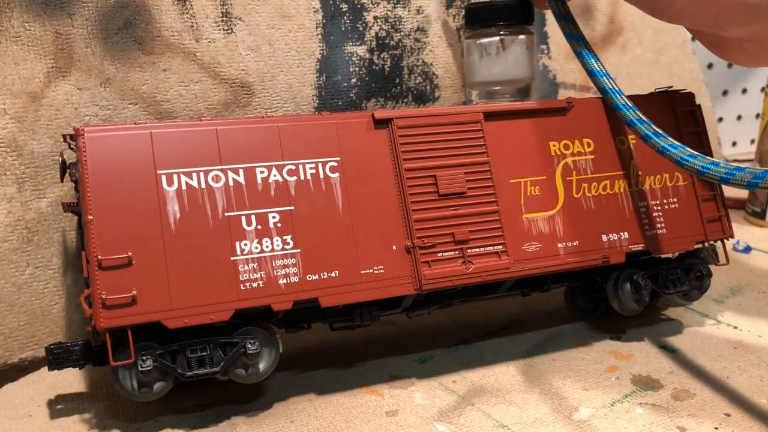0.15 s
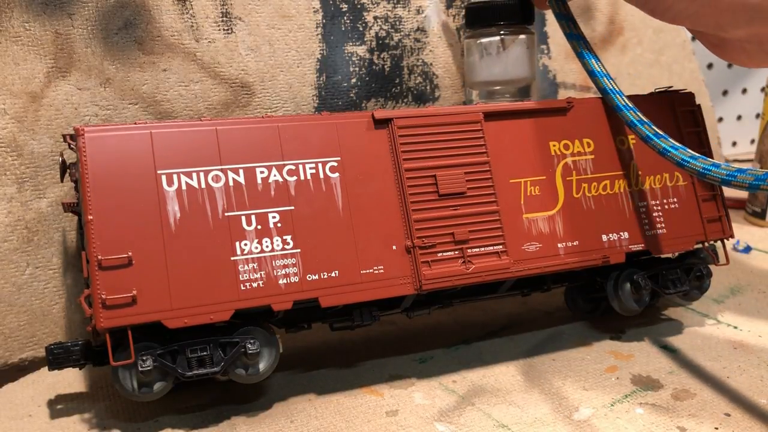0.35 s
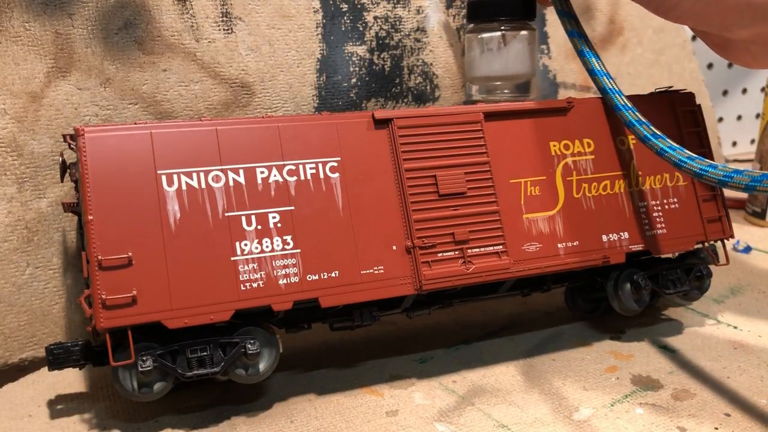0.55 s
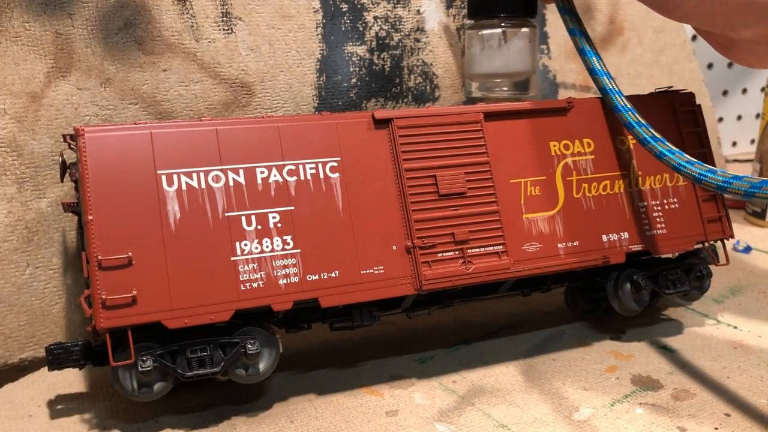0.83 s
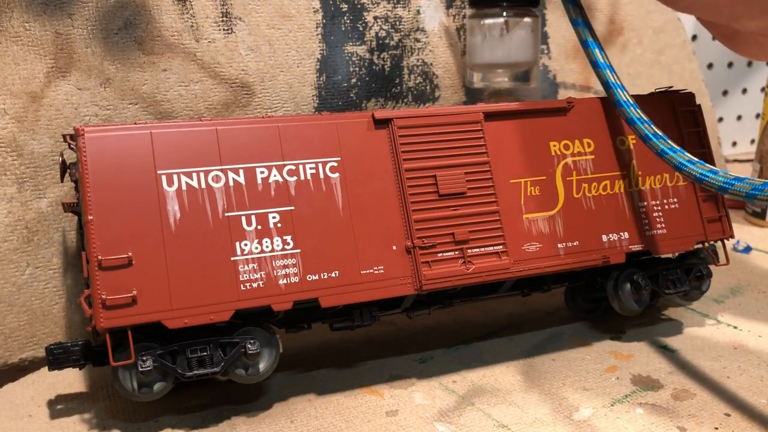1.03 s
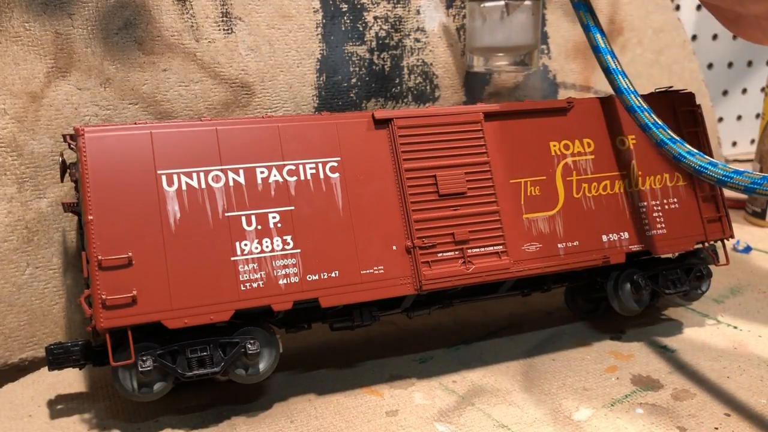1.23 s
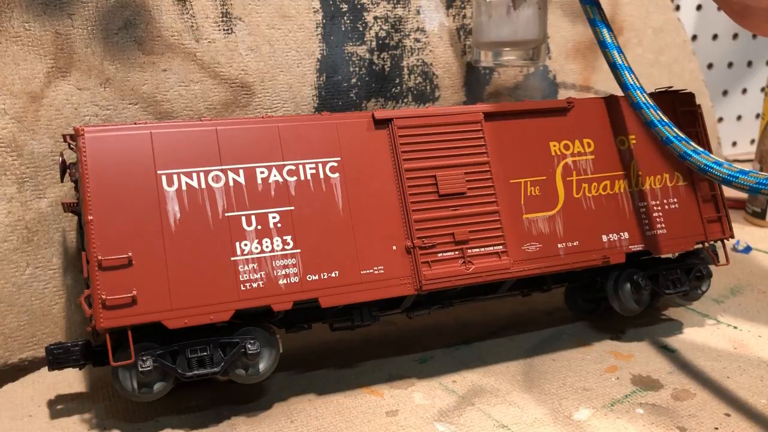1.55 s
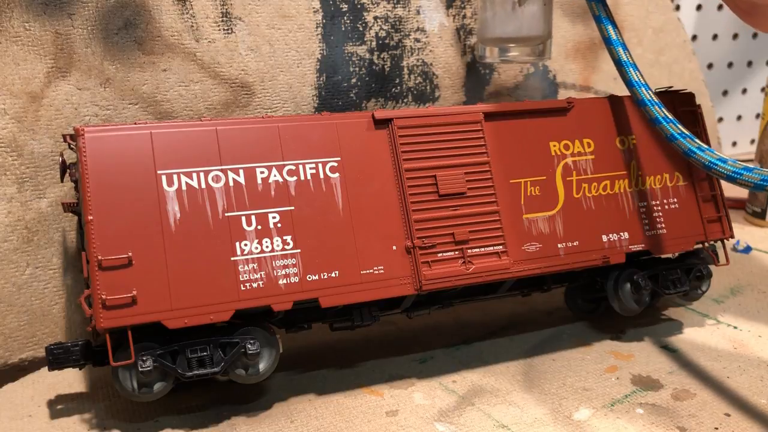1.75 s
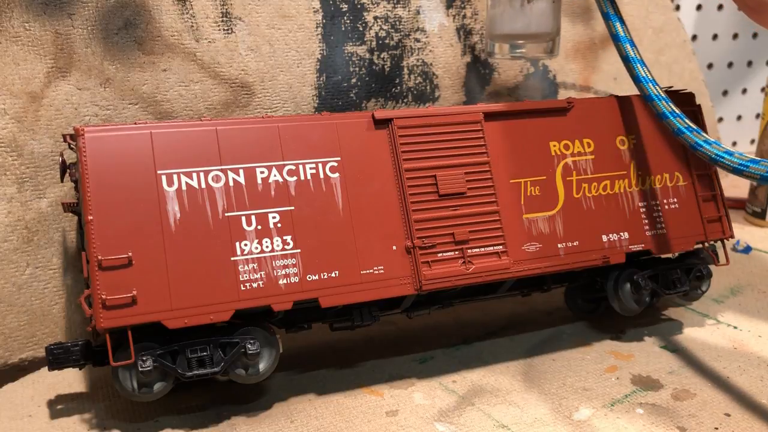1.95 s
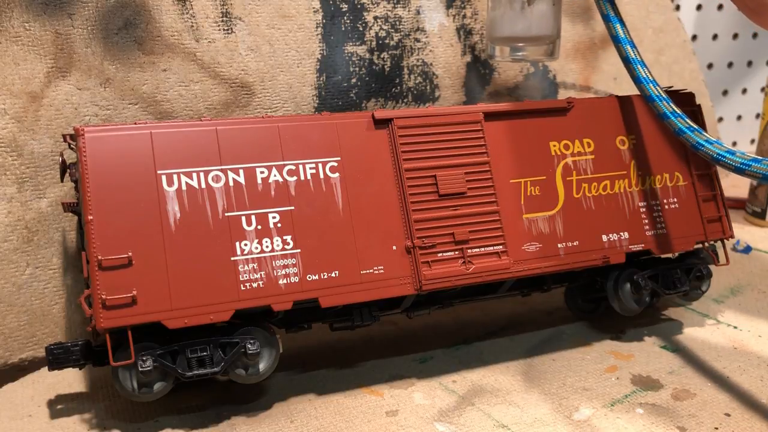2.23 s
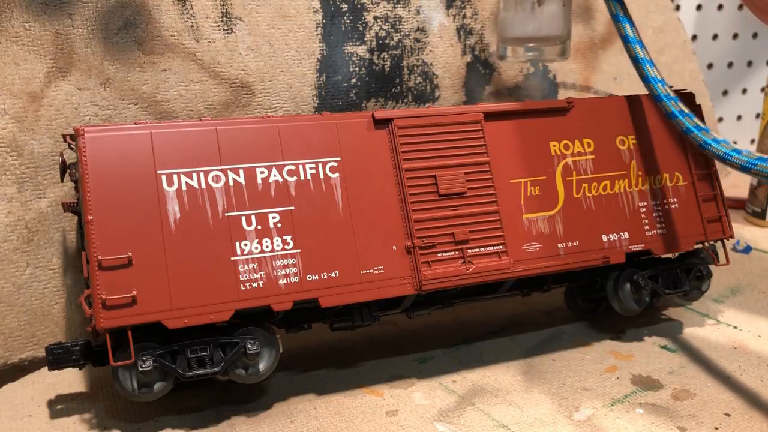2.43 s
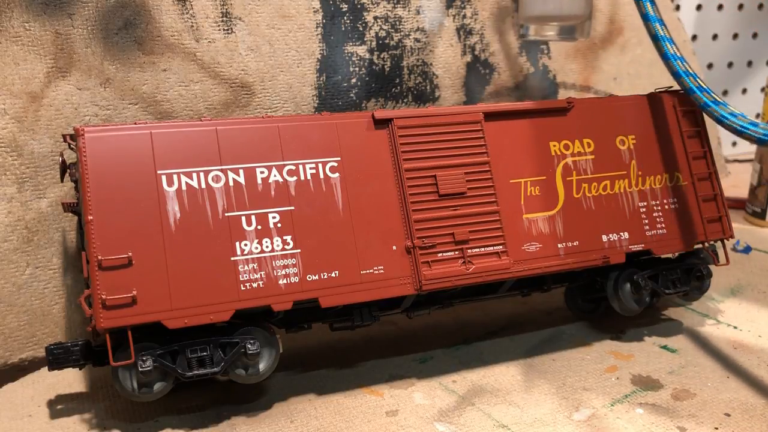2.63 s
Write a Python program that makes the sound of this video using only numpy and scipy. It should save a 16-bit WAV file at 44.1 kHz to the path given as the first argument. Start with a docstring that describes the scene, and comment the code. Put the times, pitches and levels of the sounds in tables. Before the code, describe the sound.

Close airbrush spray: a bright, airy hiss from about 0.02 to 0.37 seconds, a tiny metallic trigger tick at 0.5, then seven softer bursts of 0.14 to 0.2 seconds at 0.59, 0.9, 1.15, 1.37, 1.71, 1.96 and 2.6. Faint leaking air precedes some, notably from 2.15 to 2.45. A quiet compressor hums and rattles steadily below; short small-workshop echoes follow each burst.

```python
"""Airbrush bursts over a compressor

Eight short bursts of air from an airbrush are heard close by in a small workshop. The hiss is turbulent jet
noise, filtered differently for each hand position; a faint thin hiss leads into several bursts, and air leaks
for a while between two of them. The trigger ticks once: a noise crack and decaying modes. Beneath, a piston
compressor drones almost evenly: shaft harmonics, pulsing rattle and motor whine. Bench and walls return
decaying echoes."""
import sys
import numpy as np
from scipy import signal
from scipy.fft import rfft, irfft
from scipy.io import wavfile
from scipy.ndimage import uniform_filter1d

SR = 44100
rng = np.random.default_rng(int(sys.argv[2]) if len(sys.argv) > 2 else 0)


def to_wav(s):
    """Save 16-bit WAV."""
    ch = np.atleast_2d(s).T  # columns
    pcm = np.round(np.clip(ch, -1, 1) * 32767)  # PCM
    wavfile.write(sys.argv[1], SR, pcm.astype(np.int16))


def magnitude_from_level(level_db):
    """Linear magnitude for a level in decibels (20 dB per decade)."""
    exponent = np.asarray(level_db, float) / 20
    return 10 ** exponent


N = 123479  # samples, 2.8 s


def colour(x, table, shift=1):
    """Linear filtering: a spectrum shaped by (hz, gain_db) points, moved by a ratio, scaled to rms 1."""
    f = np.maximum(np.fft.rfftfreq(len(x), 1 / SR), 1)
    hz, db = np.array(table, float).T
    gain_db = np.interp(np.log(f / shift), np.log(hz), db)
    y = irfft(rfft(x) * magnitude_from_level(gain_db), len(x))
    return y / y.std()


def walk(rate):
    """Slow random modulation: values held for 1 / rate seconds, smoothed twice, scaled to spread 1."""
    hold = int(SR / rate)
    steps = np.repeat(rng.standard_normal(N // hold + 1), hold)[:N]
    w = uniform_filter1d(uniform_filter1d(steps, hold), hold)
    return w / w.std()


# shaft speed: time_s, turns_per_s
SHAFT_SPEED = [(0., 27.4), (.45, 27.4), (.6, 27.34), (2.25, 27.34), (2.45, 27.25), (2.8, 27.2)]
# harmonics of the shaft rate: multiple, relative_level_db
SHAFT_HARMONICS = [(2, -18.5), (3, 0), (4, -8.5), (5, -0.5), (6, -1.5), (7, -33), (8, -15), (9, -13),
                   (10, -11.5), (11, -11.5), (12, -30), (13, -10), (14, -35), (15, -19), (16, -13.5),
                   (17, -39), (18, -17), (19, -22.5), (20, -27), (21, -23.5), (22, -13), (23, -37),
                   (24, -8.5), (25, -21.5), (26, -43), (27, -23), (28, -21.5), (29, -23), (30, -43),
                   (32, -23), (33, -37), (34, -33), (35, -15.5), (36, -23), (37, -24.5), (38, -44),
                   (39, -35), (41, -26), (43, -41)]
# two knocks a turn in each vibrating part:
# highest_multiple, first_knock_turns, gap_turns, second_knock_db, push_or_pull_sign
PART_KNOCKS = [(7, .352, .44, 0, -1), (16, .697, .315, -2, 1), (44, 1.027, .36, -2, 1)]
# ringing tones of the casing: multiple
RINGING_MULTIPLES = (22, 24, 35)
# slow swell of those tones: time_s, level_change_db
CASING_SWELL = [(0, -2), (.12, -4.5), (.2, -16), (.42, -6), (.5, -2.5), (.9, -1.5), (1.5, -3), (2.1, -1.5),
                (2.4, 3.5), (2.8, 1)]
RING_TURN = 0.25  # cycles; a part driven at its resonance is a quarter cycle off the knock
DRONE_DB, SWAY_DB, SWAY_PER_S = -51, 0.5, 4
WAVER_DB_PER_MULTIPLE, WAVER_PER_S = 0.071, 4.76


def shaft_drone(t, turns):
    """Fourier series of a periodic force: each harmonic takes its phase from two knocks a turn."""
    drone = np.zeros(N)
    for k, db in SHAFT_HARMONICS:
        first, gap, second_db, sign = next(row[1:] for row in PART_KNOCKS if k <= row[0])
        phase = np.angle(1 + magnitude_from_level(second_db) * np.exp(-2j * np.pi * k * gap))
        if k in RINGING_MULTIPLES:
            change_db = np.interp(t, *np.array(CASING_SWELL).T)
            phase += 2 * np.pi * RING_TURN
        else:
            change_db = WAVER_DB_PER_MULTIPLE * k * walk(WAVER_PER_S)  # higher harmonics waver more
        drone += sign * magnitude_from_level(db + change_db) * np.cos(2 * np.pi * k * (turns - first) + phase)
    sway_db = SWAY_DB * walk(SWAY_PER_S)
    return magnitude_from_level(DRONE_DB + sway_db) * np.sqrt(2) * drone  # root 2: harmonic levels are rms


# rattle spectrum: hz, gain_db
RATTLE_COLOUR = [(25, -19.5), (45, -10), (70, -6), (150, 1.5), (300, -11), (500, -11), (800, -9),
                 (1000, -7.5), (1300, -13.5), (1700, -18), (2300, -18), (3000, -20), (3800, -18.5),
                 (5600, -20.5), (10000, -17.5), (13000, -14), (13800, -11), (14400, -12), (15500, -13),
                 (16000, -31)]
RATTLE_DB, RATTLE_PULSE_DB, RATTLE_TURN = -53.5, -1, 0.23  # faintest at this fraction of a turn


def rattle(turns):
    """Amplitude modulation: broadband noise rises and falls once a turn."""
    pulse = magnitude_from_level(RATTLE_PULSE_DB * np.cos(2 * np.pi * (turns - RATTLE_TURN)))
    return magnitude_from_level(RATTLE_DB) * pulse * colour(rng.standard_normal(N), RATTLE_COLOUR)


# motor whine: hz, level_db_rms, width_hz
MOTOR_WHINE = [(2057, -74, 90), (2240, -74, 90), (2526, -74, 80), (3790, -74, 60)]


def whine():
    """Resonance: narrow peaks select thin bands from noise."""
    out = np.zeros(N)
    for hz, db, width in MOTOR_WHINE:
        peak = signal.iirpeak(hz, hz / width, fs=SR)
        band = signal.lfilter(*peak, rng.standard_normal(N))
        out += magnitude_from_level(db) * band / band.std()
    return out


def compressor(t):
    """Superposition: periodic drone and rattle share one shaft angle, with the motor whine added."""
    turns = np.cumsum(np.interp(t, *np.array(SHAFT_SPEED).T)) / SR
    return shaft_drone(t, turns) + rattle(turns) + whine()


# faint thin hiss, mostly just ahead of a burst, the long one a leak of air: start_s, end_s, level_db
THIN_HISS_TIMES = [(0, 0.024, -53), (0.881, 0.907, -42), (1.141, 1.163, -45), (2.146, 2.455, -51.5),
                   (2.583, 2.612, -48.5)]
# thin hiss spectrum: hz, gain_db
THIN_HISS_COLOUR = [(3000, -13), (5000, -9), (6900, -8), (7500, -2.5), (9000, -2.5), (9600, -9), (11200, -2.5),
                    (12800, -6), (13500, -4.5), (13900, -1), (14800, -0.5), (15600, 1), (16000, -4)]
THIN_HISS_FADE_S = 0.025


def thin_hiss(t):
    """Gated noise: a thin hiss, short just ahead of bursts and longer where air leaks, at half height at each
    start and end."""
    gate = np.zeros(N)
    for start, end, db in THIN_HISS_TIMES:
        inside = np.minimum(t - start, end - t)
        gate += magnitude_from_level(db) * np.clip(inside / THIN_HISS_FADE_S + 0.5, 0, 1)
    return gate * colour(rng.standard_normal(N), THIN_HISS_COLOUR)


# bursts: start_s, length_s, level_db before finger pressure, change_to_end_db, colour_shift_ratio,
# hand_position
AIR_BURSTS = [(0.018, 0.35, -18.5, -1.5, 1.024, "near"), (0.586, 0.177, -22, 2.5, 1.018, "close"),
              (0.896, 0.14, -22, -.5, 1.001, "back"), (1.154, 0.16, -23, -1, 0.994, "turned"),
              (1.37, 0.2059, -23, 0, 1.013, "mid"), (1.714, 0.1741, -24, 0, 0.997, "mid"),
              (1.958, 0.17, -23.5, -0.8, 0.999, "mid"), (2.598, 0.14, -23, -1, 1.046, "far")]
# jet spectrum at each hand position, before the burst's shift: hz, gain_db
NEAR_COLOUR = [(700, -66), (1200, -39.5), (1800, -27.5), (2350, -19.5), (2650, -25), (3500, -13),
               (4100, -23), (5150, -17.5), (5550, -6), (6200, -4), (6600, 1), (7200, -5.5), (7550, -10),
               (8250, -7), (8900, -3.5), (9200, -2.5), (9600, -1), (10800, -2), (11800, 3), (12400, -5),
               (12800, 4), (13300, 2.5), (13700, -2), (14300, -7), (15000, -0.5), (15700, -4), (16000, -18)]
CLOSE_COLOUR = [(710, -63), (1200, -35), (1510, -28), (1660, -25.5), (2530, -20), (3180, -17.5),
                (3470, -10.5), (3950, -18), (4500, -16.5), (5130, -12.5), (5650, -5), (6650, 1), (7020, -4),
                (7570, -10.5), (8720, -4), (9510, -1), (11900, -1), (13000, -1.5), (14200, -4.5),
                (15200, -2.5), (16000, -31)]
BACK_COLOUR = [(710, -39), (1200, -32.5), (1610, -23), (1850, -18.5), (2000, -22.5), (2380, -17.5),
               (2760, -17.5), (3320, -11.5), (4450, -13.5), (5300, -5.5), (6580, -2), (7490, -10),
               (8630, -7), (9410, 1.5), (11300, -5.5), (12600, -0.5), (13700, -7), (15200, 0.5),
               (16000, -22.5)]
TURNED_COLOUR = [(710, -59), (1200, -28.5), (1950, -19), (2200, -19), (2400, -15), (2620, -17.5),
                 (3080, -9.5), (3510, -15), (4130, -9), (4450, -14), (5180, -4), (5590, -9), (6370, -6),
                 (7910, -12.5), (9010, -0.5), (10800, -7), (13900, 0), (15500, -1), (16000, -24)]
MID_COLOUR = [(710, -43), (1200, -26.5), (1310, -27.5), (1700, -19.5), (1890, -19.5), (2510, -16.5),
              (2730, -19.5), (2950, -9.5), (3180, -16), (3790, -13), (4080, -11.5), (4450, -14.5),
              (4910, -9.5), (5530, -12.5), (6300, -6.5), (6870, -10.5), (7820, -12), (8260, -8), (8630, -2),
              (10700, -8), (12300, 1), (14000, -8), (15200, -2.5), (16000, -16)]
FAR_COLOUR = [(530, -50.5), (900, -27), (1190, -30), (1280, -22), (1970, -20), (2300, -19.5), (2540, -17.5),
              (3680, -11.5), (4410, -16), (6890, -5.5), (7860, -12.5), (8250, -4), (10900, -2.5),
              (11700, 0), (12900, -8), (15100, -0.5), (16000, -15.5)]
HAND_COLOURS = dict(near=NEAR_COLOUR, close=CLOSE_COLOUR, back=BACK_COLOUR,
                    turned=TURNED_COLOUR, mid=MID_COLOUR, far=FAR_COLOUR)
# dull rush of the air striking the bench: hz, gain_db
BENCH_RUSH = [(150, -15), (400, 2.5), (700, -1), (1000, -4.5), (1300, -1.5), (2500, -8)]
# the bare jet, as the walls hear it: hz, gain_db
BARE_JET = [(800, -15), (2000, -15), (3500, -6), (4500, -5), (6000, -5.5), (10000, -5.5), (13000, -5),
            (16000, -0.5)]
# finger pressure on the trigger: time_s, level_change_db
FINGER_PRESSURE = [(.0, -4.5), (.101, -6.5), (.107, -0.3), (.275, 0.4), (.30, -2), (.335, -5), (.35, 2.5),
                   (.38, 1.5), (1.70, 0.5), (1.716, -1.5), (1.735, -1.5), (1.76, 0), (1.835, -1),
                   (1.845, 1), (1.90, 1), (1.93, 0)]
OPEN_S, SHUT_S = 0.003, 0.002  # time constants of the valve
SETTLE_DB, SETTLE_S = -2, 0.023  # the flow starts low and settles
SAG_DB, SAG_S = -1, 0.023  # it sags just before the valve shuts
RUSH_DB = -30.5  # relative to the hiss
FLUTTER_DB, FLUTTER_PER_S = 0.59, 150
BODY_HZ, BODY_SHARE = 5230, 0.68  # below this edge the sound follows this share of the finger's dB


def valve(t, start, length, db, change_db):
    """First-order response: exponential opening and shutting, with a starting dip and a closing sag."""
    since_open = np.maximum(t - start, 0)
    since_shut = np.maximum(t - start - length, 0)
    before_shut = np.minimum(t - start - length, 0)
    gate = (1 - np.exp(-since_open / OPEN_S)) * np.exp(-since_shut / SHUT_S)
    drift_db = change_db * np.clip((t - start) / length, 0, 1)
    settle_db = SETTLE_DB * np.exp(-since_open / SETTLE_S)
    sag_db = SAG_DB * np.exp(before_shut / SAG_S)
    return gate * magnitude_from_level(db + drift_db + settle_db + sag_db)


def airbrush(t):
    """Turbulent jet noise: gated hiss with random flutter, coloured nearby; returns near and bare jet."""
    near, flow = np.zeros(N), np.zeros(N)
    for start, length, db, change_db, shift, hand in AIR_BURSTS:
        gate = valve(t, start, length, db, change_db)
        near += gate * colour(rng.standard_normal(N), HAND_COLOURS[hand], shift)
        flow += gate
    near += magnitude_from_level(RUSH_DB) * flow * colour(rng.standard_normal(N), BENCH_RUSH)
    finger_db = np.interp(t, *np.array(FINGER_PRESSURE).T)
    press = magnitude_from_level(finger_db + FLUTTER_DB * walk(FLUTTER_PER_S))
    body = irfft(rfft(near) * (np.fft.rfftfreq(N, 1 / SR) < BODY_HZ), N)
    near += body * (magnitude_from_level((BODY_SHARE - 1) * finger_db) - 1)  # press then leaves the body its share
    bare = flow * press * colour(rng.standard_normal(N), BARE_JET)
    return near * press, bare


# trigger tick: start_s, level_db
TRIGGER_TICKS = [(0.495, -27)]
# contacts within a tick: delay_s, relative_level_db
TICK_CONTACTS = [(-.0003, -12), (0., -2), (.00057, -3), (.0052, -20)]
# modes of the small metal parts: hz, relative_level_db, t60_s
METAL_MODES = [(1930, -12.5, 0.012), (3334, -24, 0.005), (4670, -15, 0.009), (5480, -14, 0.012),
               (7600, -7, 0.007), (9020, -2.5, 0.0045), (10410, -6, 0.006), (12800, -12, 0.0042),
               (15400, -7, 0.0064)]
CRACK_DB, CRACK_T60_S = -4, 0.0015


def trigger(t):
    """Impact and modal decay: metal parts touch and bounce, each contact a noise crack and short rings."""
    out = np.zeros(N)
    for start, db in TRIGGER_TICKS:
        for delay, contact_db in TICK_CONTACTS:
            u = np.maximum(t - start - delay, 0)
            hit_db = db + contact_db
            crack = magnitude_from_level(hit_db + CRACK_DB - 60 * u / CRACK_T60_S) * rng.standard_normal(N)
            out += (u > 0) * crack
            for hz, mode_db, t60 in METAL_MODES:
                out += magnitude_from_level(hit_db + mode_db - 60 * u / t60) * np.sin(2 * np.pi * hz * u)
    return out


BENCH_DB, BENCH_T60_S = -10, 0.075
ROOM_DB, ROOM_T60_S = -17, 0.27


def reverberate(x, db, t60, t):
    """Diffuse reverberation: convolution with exponentially decaying noise of unit energy."""
    h = rng.standard_normal(N) * magnitude_from_level(-60 * t / t60)
    h = h / np.sqrt(np.sum(h ** 2))
    return magnitude_from_level(db) * signal.fftconvolve(x, h)[:N]


def room(near, far, t):
    """Two decay rates: quick bench echoes of near sounds, and a longer tail from the walls."""
    bench = reverberate(near, BENCH_DB, BENCH_T60_S, t)
    walls = reverberate(far, ROOM_DB, ROOM_T60_S, t)
    return bench + walls


def scene():
    """Superposition: brush and tick with their echoes, thin hiss and compressor; both channels alike."""
    t = np.arange(N) / SR
    drone, hiss = compressor(t), thin_hiss(t)
    near, bare = airbrush(t)
    tick = trigger(t)
    mono = near + tick + hiss + room(near + tick, bare, t) + drone
    return np.array([mono, mono])


def roll_off(x):
    """The treble ends steeply here."""
    return signal.sosfilt(signal.butter(12, 16830, fs=SR, output="sos"), x)


def record(dry):
    """Low-pass filtering: the camera's steep elliptic filter cuts the top above 15.8 kHz."""
    top_cut = signal.ellip(14, 0.3, 70, 15800, fs=SR, output="sos")
    mix = signal.sosfilt(top_cut, dry)
    return roll_off(mix)


dry = scene()
out = record(dry)
to_wav(out)
```